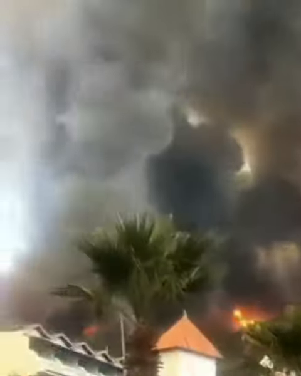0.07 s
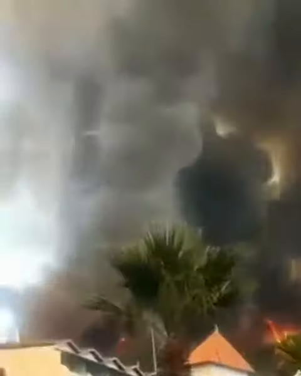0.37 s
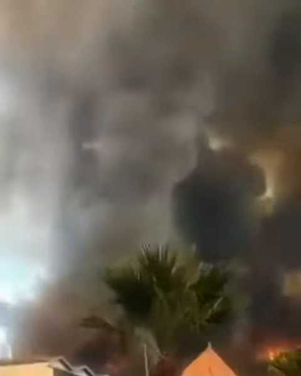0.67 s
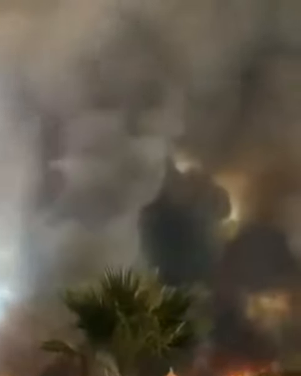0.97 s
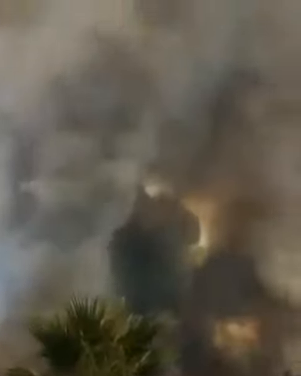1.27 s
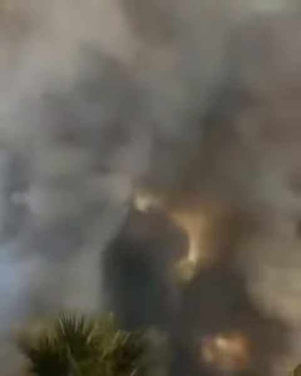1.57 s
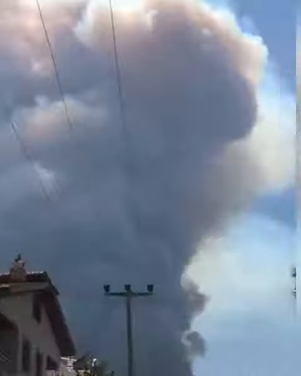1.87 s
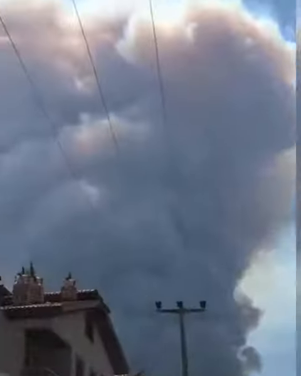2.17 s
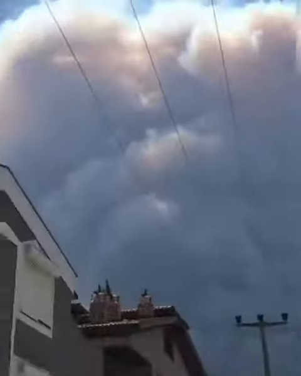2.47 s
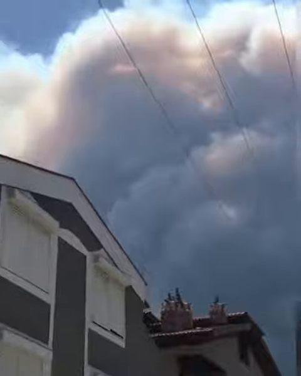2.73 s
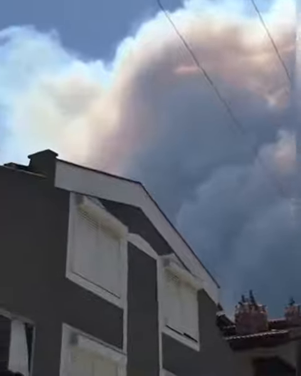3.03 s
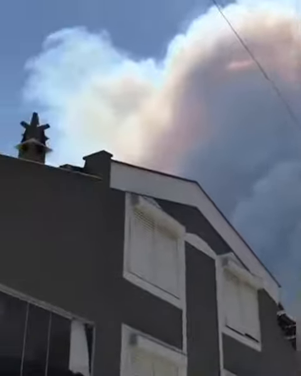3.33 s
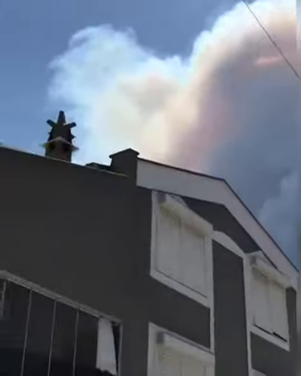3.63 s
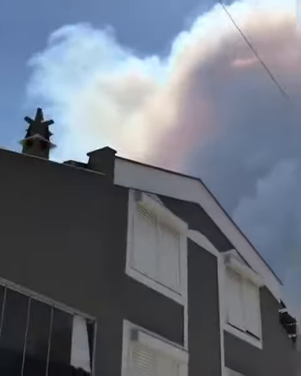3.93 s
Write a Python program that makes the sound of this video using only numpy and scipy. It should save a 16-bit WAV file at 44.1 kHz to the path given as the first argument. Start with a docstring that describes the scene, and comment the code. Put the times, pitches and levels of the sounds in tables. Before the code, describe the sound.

A passing vehicle is the main sound, following a deep engine drone and distant rush with soft wind thumps on the microphone. Its tyres crackle on grit, it rattles over a bump, and its exhaust recedes along a street.

```python
"""Outdoors near a wildfire, in two scenes. First a deep engine drone beats against an idling engine over
the turbulent rush of distant fire and wind, with faint sizzles and whistles, soft wind thumps and one tick.
After a brief silence a vehicle passes close by: its firings ring the exhaust pipe, its tyres hiss and
crackle on grit, and it rattles over a bump. House fronts scatter the exhaust as it draws away, and the
engine slows and labours."""
import sys
import numpy as np
from scipy import signal
from scipy.fft import rfft, irfft
from scipy.io import wavfile
from scipy.ndimage import uniform_filter1d

SR = 44100
rng = np.random.default_rng(int(sys.argv[2]) if len(sys.argv) > 2 else 0)


def transcribe(signal):
    """Save signal, clipped to [-1, 1], as a 16-bit WAV file at the path in sys.argv[1]."""
    frames = np.atleast_2d(signal).T
    limited = np.clip(frames, -1, 1)
    pcm = np.round(limited * 32767).astype(np.int16)
    wavfile.write(sys.argv[1], SR, pcm)


N = 176400
T = np.arange(N) / SR
PASS_S, PASS_WIDTH_S = 2.323, 0.11  # moment of closest approach, time scale of the pass

# spectrum of small hard impacts, rattles and grit alike: frequency_hz, relative_db
IMPACT_SPECTRUM = [(300, -8), (1000, 0), (2000, -1), (3500, -2), (7000, -9), (13500, -18)]


def undb(db):
    """Decibels to amplitude ratio."""
    return 10 ** (np.asarray(db) / 20)


def curve(rows):
    """Linear interpolation through rows of time_s, value."""
    return np.interp(T, *np.array(rows).T)


def walk(rate_hz):
    """Smoothed random steps: a slow drift with a spread near 1."""
    hold = int(SR / rate_hz)
    steps = np.repeat(rng.standard_normal(N // hold + 1), hold)
    return 1.3 * uniform_filter1d(uniform_filter1d(steps, hold), hold)[:N]


def colour(x, spectrum):
    """Minimum-phase filter through rows of frequency_hz, relative_db; the result has rms 1."""
    hz, db = np.array(spectrum, float).T
    bins_hz = np.maximum(np.arange(N + 1) * SR / (2 * N), 1)
    gain = undb(np.interp(np.log(bins_hz), np.log(hz), db))
    cepstrum = irfft(np.log(gain))
    cepstrum[1:N] *= 2  # folding the cepstrum makes the filter causal
    cepstrum[N + 1:] = 0
    y = irfft(rfft(x, 2 * N) * np.exp(rfft(cepstrum)))[:N]
    return y / np.std(y)


def noise(spectrum, flicker_db=1.0):
    """Turbulence: shaped noise whose octave bands flicker independently."""
    white = rfft(rng.standard_normal(N))
    bins_hz = np.arange(N // 2 + 1) * SR / N
    octave = np.clip(np.log2(np.maximum(bins_hz, 1) / 60), 0, 8).astype(int)
    bands = (irfft(white * (octave == k), N) * undb(flicker_db * walk(12)) for k in np.unique(octave))
    return colour(sum(bands), spectrum)


def swell(at, width):
    """Gaussian envelope; width is its standard deviation in seconds."""
    return np.exp(-.5 * ((T - at) / width) ** 2)


def swells(rows):
    """Sum of Gaussian envelopes from rows of peak_s, width_s, level_db."""
    return sum(undb(db) * swell(at, width) for at, width, db in rows)


def strike(at, decay):
    """Envelope of a damped impact: instant attack, exponential decay."""
    return (T >= at) * np.exp(-np.abs(T - at) / decay)


def low_pass(x, hz):
    """Elliptic filter: a steep cut above hz."""
    return signal.sosfilt(signal.ellip(10, .2, 70, hz, fs=SR, output="sos"), x)


def hum(hz, harmonics, crest_s=.027, drift_cycles=.14, waver_db=2.5):
    """Harmonic series of a rotating machine: steady in the bass, wavering higher up."""
    cycles = hz * (T - crest_s)
    out = 0
    for k, db in harmonics:
        unsteady = min(k * hz / 200, 1) ** 2
        phase = k * cycles + unsteady * drift_cycles * walk(4.05)
        rms = undb(db + unsteady * waver_db * walk(6.21))
        out = out + rms * np.sqrt(2) * np.cos(2 * np.pi * phase)
    return out


def far_engines(firing_hz=36.4, shaft_hz=12.55, whine_hz=233.6, whine_db=-51.5):
    """Beating: two engines' strongest partials interfere ten times a second, under a faint whine."""
    # partials of the droning engine: multiple_of_firing_rate, level_db
    drone = [(2, -23), (4, -49.5), (5, -49.5), (15, -57)]
    # partials of the idling engine: multiple_of_shaft_rate, level_db
    idle = [(4, -53.5), (5, -40), (8, -50), (9, -48), (10, -57), (11, -57), (20, -58), (22, -53), (31, -52),
            (32, -56), (34, -55.5), (35, -56.5)]
    return hum(firing_hz, drone) + hum(shaft_hz, idle) + hum(whine_hz, [(1, whine_db)])


def distant_rush():
    """Turbulence in distant fire and wind radiates broadband noise, strongest in the bass."""
    # spectrum of the rush: frequency_hz, relative_db
    spectrum = [(25, -17.5), (55, 0), (100, -5), (170, -7.5), (250, -8), (330, -9.5), (410, -8.5),
                (490, -13.5), (690, -11), (790, -16.5), (930, -13), (1400, -19.5), (2000, -27), (3000, -30),
                (4200, -35), (4600, -31.5), (4950, -38.5), (5400, -33), (6000, -38), (6600, -36.5),
                (8000, -45.5), (11000, -55.5), (13000, -55.5)]
    # strength of the rush: time_s, level_db
    levels = [(0, -40), (.5, -38.5), (.85, -39.5), (1.1, -39.5), (1.45, -40), (1.7, -39.5), (1.9, -38.5)]
    return undb(curve(levels)) * noise(spectrum)


def sizzles():
    """Amplitude-modulated noise: brief, very high hisses from the fire."""
    # faint hisses: peak_s, width_s, level_db
    hisses = [(.39, .05, -73), (.68, .04, -71)]
    # spectrum of a sizzle: frequency_hz, relative_db
    spectrum = [(4000, -25), (7500, -4), (9500, 0), (11500, 0), (13000, -12)]
    return noise(spectrum) * swells(hisses)


def whistles(bandwidth_hz=380):
    """Narrow-band turbulence in rushing air is heard as thin pitches, most of them gliding."""
    # whistles of air: peak_s, width_s, pitch_hz, glide_hz_per_s, level_db
    tones = [(.86, .07, 6450, 0, -68.5), (2.13, .035, 4520, 3000, -56), (2.38, .035, 4200, -4000, -49.5),
             (2.38, .03, 4880, -4000, -52.5)]
    out = 0
    for at, width, hz, glide, db in tones:
        phase = 2 * np.pi * (T - at) * (hz + glide * (T - at) / 2)
        band = walk(bandwidth_hz) * np.cos(phase) + walk(bandwidth_hz) * np.sin(phase)
        out = out + undb(db) * swell(at, width) * band
    return out


def wind_thumps(hz=72):
    """Pressure fluctuations of wind on the microphone make soft bursts of bass noise."""
    # gusts: peak_s, width_s, level_db
    gusts = [(1.515, .014, -29), (1.83, .045, -33.5)]
    buffet = noise([(hz / 4, -25), (hz, 0), (hz * 2, -6), (hz * 16, -60), (14000, -90)])
    return buffet * swells(gusts)


def tick():
    """A transient: bright noise that decays almost at once is heard as one dry tick."""
    # spectrum of the tick: frequency_hz, relative_db
    spectrum = [(800, -25), (2500, -9), (3900, -4), (5000, -9), (6700, 0), (8000, -5), (10000, -7),
                (12500, -17), (14000, -30)]
    return colour(rng.standard_normal(N), spectrum) * strike(at=1.85, decay=.0005) * undb(-23.5)


def firing_cycles(in_phase_s=1.999):
    """Phase is the integral of frequency: the passing engine advances one cycle per firing."""
    # engine speed: time_s, firing_rate_hz
    rates = [(1.9, 37.8), (2.1, 37.8), (2.34, 37.2), (2.55, 37.0), (3.63, 37.05), (3.75, 35.5), (4.0, 34.6)]
    cycles = np.cumsum(curve(rates)) / SR
    return cycles - np.interp(in_phase_s, T, cycles)


def firing_pulses(cycles, jitter_s=.0003, scatter_db=1.5):
    """A quasi-periodic pulse train: one pressure pulse per firing, uneven in time and size."""
    firings = np.flatnonzero(np.diff(np.floor(cycles)))
    late, size = rng.standard_normal((len(firings), 2)).T
    onsets = np.clip(firings + (late * jitter_s * SR).astype(int), 0, N - 1)
    pulses = np.zeros(N)
    pulses[onsets] = undb(scatter_db * size)
    return pulses - pulses.mean()


def exhaust(cycles, cruise_from_s=2.38, cruise_to_s=3.64, load_change_s=.063):
    """Source and filter: firings ring the pipe, whose timbre follows the load and booms at times."""
    # exhaust strength: time_s, level_db
    effort = [(1.98, -36.5), (2.14, -29), (2.3, -25), (2.42, -34.5), (2.65, -28), (2.85, -32),
              (2.95, -34.5), (3.3, -32.5), (3.45, -35), (3.62, -39), (3.75, -34), (3.87, -35.5), (4.0, -36)]
    # exhaust spectrum under load: frequency_hz, relative_db
    loaded = [(20, -53), (37, -19), (72, 5), (110, 4.5), (145, 2.5), (185, -6), (230, -11.5), (350, -20.5),
              (600, -20), (1500, -55)]
    # exhaust spectrum when cruising: frequency_hz, relative_db
    cruising = [(20, -61), (37, -14), (74, 3.5), (111, -2.5), (148, -3), (185, -3), (222, -12),
                (310, -25.5), (407, -11), (500, -26.5), (1500, -52)]
    # swells of pipe resonance: peak_s, width_s, resonance_hz, level_db
    booms = [(2.925, 0.03, 200, -33.5), (3.12, 0.13, 165, -41), (3.783, 0.044, 145.3, -36.5),
             (3.953, 0.06, 104, -37)]
    pulses = firing_pulses(cycles)
    cruise = np.clip(np.minimum(T - cruise_from_s, cruise_to_s - T) / load_change_s + .5, 0, 1)
    chug = cruise * colour(pulses, cruising) + (1 - cruise) * colour(pulses, loaded)
    pipe = undb(curve(effort)) * chug
    flow = pulses / np.std(pulses) + .58 * rng.standard_normal(N)  # pulsed plus turbulent flow
    edge = 1.26  # frequency ratio from a resonance to its -10 dB points
    for at, width, hz, db in booms:
        resonance = [(hz / edge ** 4, -30), (hz / edge, -10), (hz, 0),
                     (hz * edge, -10), (hz * edge ** 4, -30), (14000, -80)]
        pipe = pipe + undb(db) * swell(at, width) * colour(flow, resonance)
    return -pipe


def tyre_hiss(shade_hz=5000, shade_db=-2):
    """Rolling noise peaks as the tyres pass; a shelf filter shades its treble on the approach."""
    # spectrum of the hiss: frequency_hz, relative_db
    spectrum = [(300, -25), (560, -7), (710, -2), (820, -4.5), (1050, 0), (1300, -.5), (1430, -4),
                (1550, -3), (1720, -6.5), (1980, -3.5), (2350, -9.5), (2800, -7), (3300, -9.5), (3650, -12),
                (4400, -13.5), (4950, -19.5), (6700, -20), (7500, -25), (9000, -25), (10500, -30),
                (13500, -38)]
    # strength of the hiss: time_s, level_db
    levels = [(1.98, -40), (2.12, -36), (2.29, -33.5), (2.42, -36), (2.62, -35.5), (2.85, -39.5),
              (3.0, -38), (3.2, -40.5), (3.55, -40.5), (3.75, -43.5), (4.0, -45.5)]
    hiss = noise(spectrum)
    treble = signal.sosfiltfilt(signal.butter(2, shade_hz, "high", fs=SR, output="sos"), hiss)
    approach = np.clip((PASS_S - T) / PASS_WIDTH_S, 0, 1)
    return (hiss + treble * (undb(shade_db * approach) - 1)) * undb(curve(levels))


def road_roar(cycles, nearest_db=-31.5, fall_db_per_decade=5.5, pulse_depth=.056):
    """Spreading loss: a low roar, pulsing with the firings, weakens with the vehicle's distance."""
    # spectrum of the roar: frequency_hz, relative_db
    spectrum = [(22, -12), (50, 5), (130, 1.5), (260, 0), (420, -4), (510, -10.5), (650, -9.5),
                (900, -18.5), (2000, -38)]
    distance = np.hypot(1, (T - PASS_S) / PASS_WIDTH_S)  # in multiples of the closest distance
    gain = undb(nearest_db - fall_db_per_decade * np.log10(distance))
    pulsing = 1 + pulse_depth * np.cos(2 * np.pi * cycles)
    return noise(spectrum) * gain * pulsing


def grit(grains_per_s=3000, spread_db=2, level_db=-43):
    """Shot noise: grains of grit crackle at random under the tyres while they are near."""
    hits = rng.random(N) < grains_per_s / SR
    sizes = undb(spread_db * np.minimum(rng.exponential(1, N), 4))
    grains = hits * sizes * rng.choice([-1, 1], N)
    return colour(grains, IMPACT_SPECTRUM) * undb(level_db) * swell(PASS_S, width=.11)


def rattles(tail_db=-19, tail_s=.027):
    """Two-stage decay: each bright rattle of the vehicle dies quickly and trails into a rustle."""
    # rattling impacts: start_s, level_db, decay_s
    impacts = [(2.1812, -25, .002), (2.2632, -27.5, .003), (2.2672, -26, .004), (2.2935, -32.5, .005)]
    envelope = sum(undb(db) * (strike(at, decay) + undb(tail_db) * strike(at, tail_s))
                   for at, db, decay in impacts)
    return noise(IMPACT_SPECTRUM) * envelope


def clack():
    """A damped impact, duller than the rattles, just before the bump."""
    # spectrum of the clack: frequency_hz, relative_db
    spectrum = [(500, -16), (1800, -6), (2700, 0), (3600, -11), (5000, -22), (14000, -36)]
    return noise(spectrum) * undb(-33.5) * strike(at=2.2255, decay=.008)


def bump(at=2.289, width_s=.019, level_db=-26, tail_db=-9, tail_s=.05):
    """Modal ringing: a dull bump bounces the vehicle's body, which sounds as damped sinusoids."""
    # spectrum of the thud: frequency_hz, relative_db
    spectrum = [(40, -12), (70, 0), (130, 0), (250, -4), (380, -5), (470, -3), (680, -4), (780, -9),
                (950, -8), (1300, -18), (3000, -32), (14000, -65)]
    # modes of the body: pitch_hz, level_db, decay_s
    modes = [(74.2, -24, .03), (118, -28, 0.017)]
    # bounces of the body: start_s, gain_db
    bounces = [(2.282, -1), (2.322, -1)]
    envelope = np.maximum(swell(at, width_s), undb(tail_db) * swell(at + width_s, tail_s))
    thud = noise(spectrum) * undb(level_db) * envelope
    ring = sum(undb(db + gain_db) * strike(start, decay) * np.sin(2 * np.pi * hz * (T - start))
               for start, gain_db in bounces for hz, db, decay in modes)
    return thud + ring


def facades(x, echo_db=-14, decay_s=.032):
    """Diffuse reflection: house fronts smear the sound once the vehicle has gone by."""
    response = rng.standard_normal(N) * strike(0, decay_s)
    echo = signal.fftconvolve(x, response)[:N]
    echo *= np.std(x) / np.std(echo)
    wet = undb(echo_db) * np.clip((T - PASS_S) / PASS_WIDTH_S, 0, 1)
    return (x + wet * echo) / np.hypot(1, wet)


def swishes():
    """Amplitude-modulated noise: the treble swells briefly as the vehicle draws away."""
    # swells of hiss: peak_s, width_s, level_db
    hisses = [(2.6, 0.018, -52), (2.93, 0.062, -56), (3.57, 0.058, -53.5)]
    # spectrum of a swish: frequency_hz, relative_db
    spectrum = [(1500, -18), (4500, -3), (6500, 3), (9000, -2), (13500, -9)]
    return noise(spectrum) * swells(hisses)


def scene(first_ends_s=1.929, second_starts_s=1.976):
    """Superposition in two scenes: the first, a little duller, stops dead before the vehicle passes."""
    distant = far_engines() + distant_rush() + sizzles() + wind_thumps() + tick()
    first = (T < first_ends_s) * low_pass(distant, hz=13100)
    cycles = firing_cycles()
    rolling = tyre_hiss() + road_roar(cycles) + grit()
    jolts = rattles() + clack() + bump()
    second = (T > second_starts_s) * (facades(exhaust(cycles)) + rolling + jolts + swishes())
    return (first + second + whistles())[None]


def record(dry):
    """Band limiting: a phone passes nothing of the highest treble."""
    return low_pass(dry, hz=14000)


dry = scene()
out = record(dry)
transcribe(out)
```